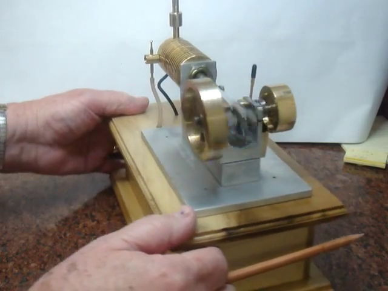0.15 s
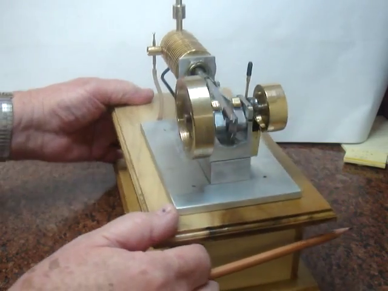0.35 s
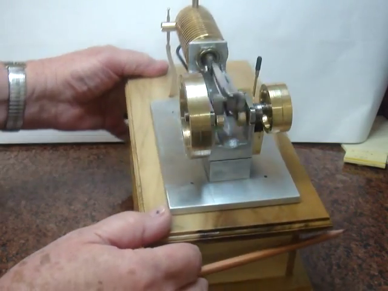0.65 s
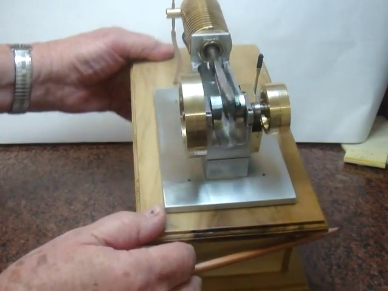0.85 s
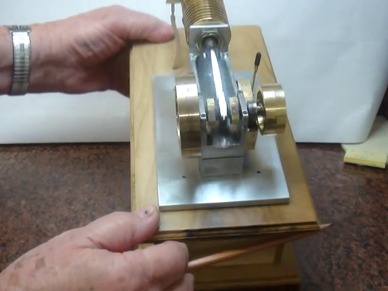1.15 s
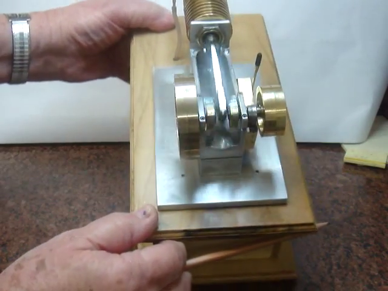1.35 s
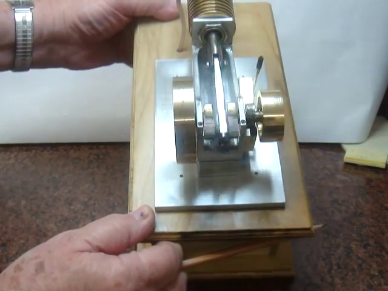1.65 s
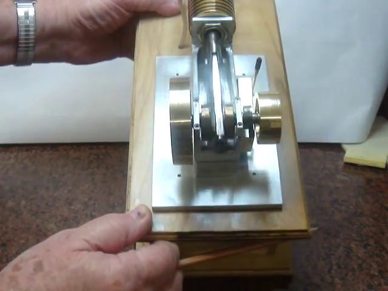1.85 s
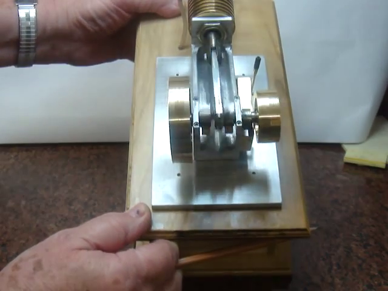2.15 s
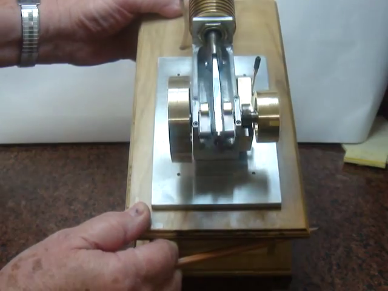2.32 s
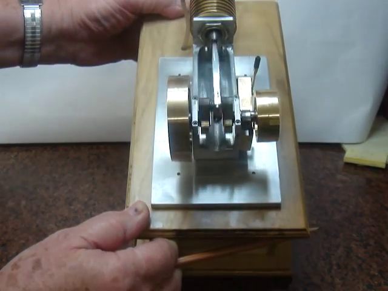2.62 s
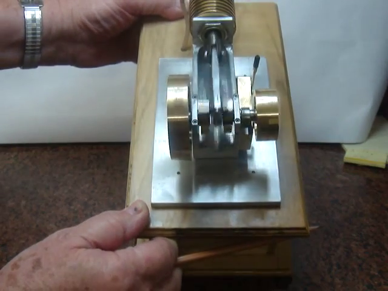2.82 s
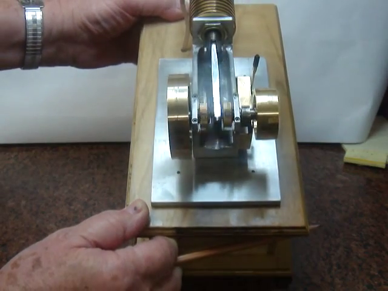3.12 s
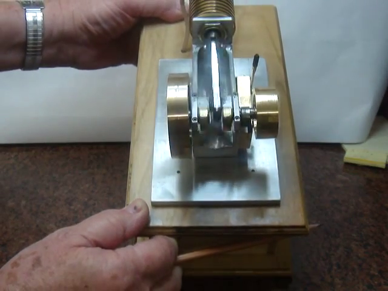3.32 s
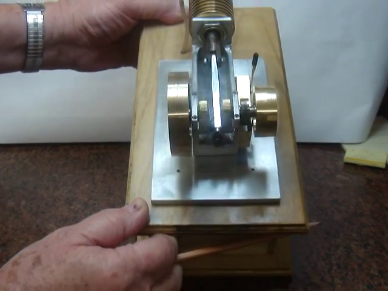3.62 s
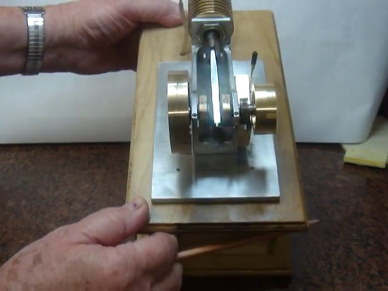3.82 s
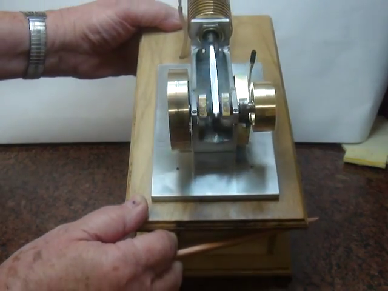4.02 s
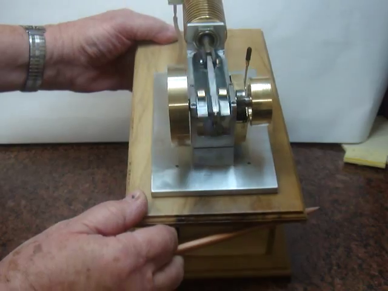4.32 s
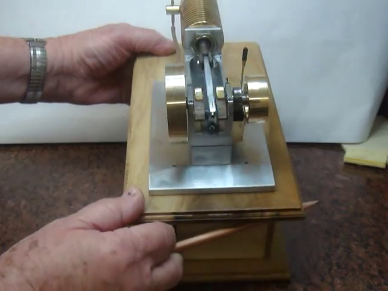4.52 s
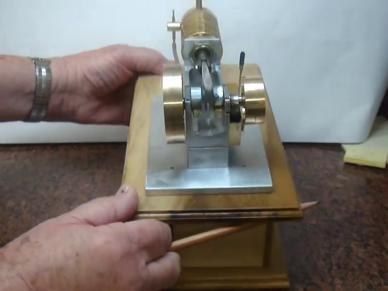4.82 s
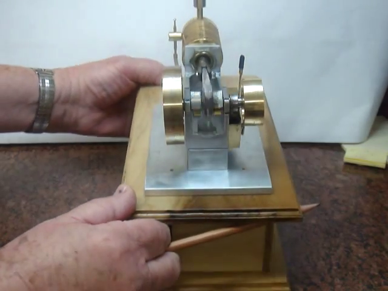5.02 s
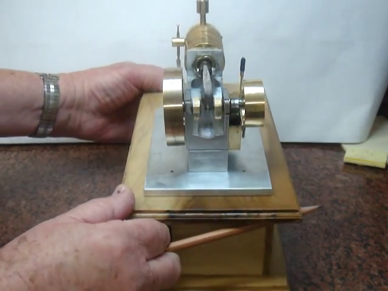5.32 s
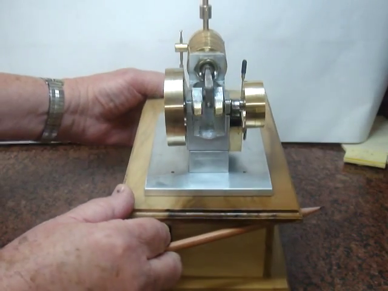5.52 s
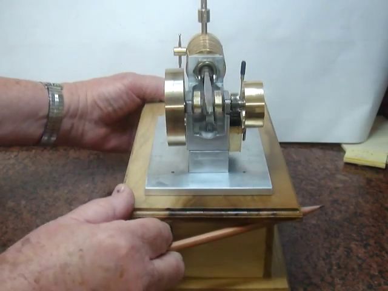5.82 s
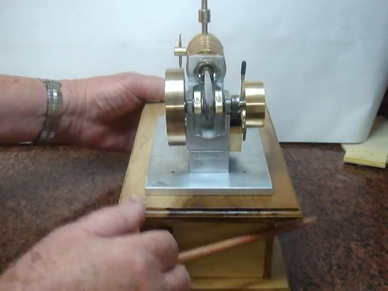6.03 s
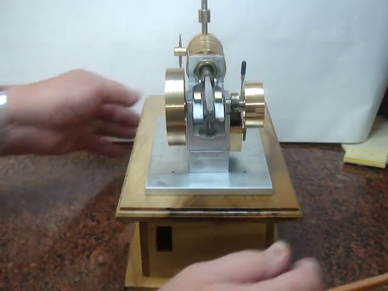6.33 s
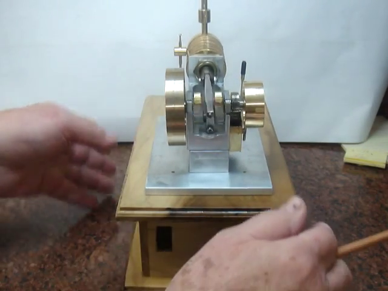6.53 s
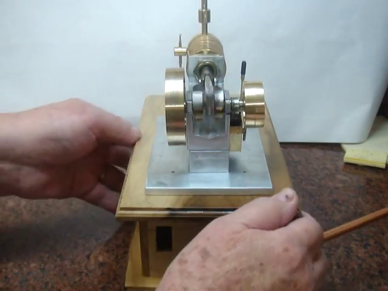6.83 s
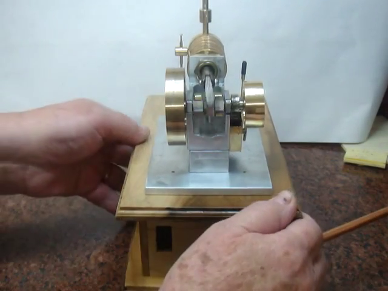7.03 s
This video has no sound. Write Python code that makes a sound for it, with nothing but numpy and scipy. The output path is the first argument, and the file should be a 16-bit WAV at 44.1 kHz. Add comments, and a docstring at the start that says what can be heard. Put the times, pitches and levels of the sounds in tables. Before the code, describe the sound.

Fast, even mechanical clatter of a little solenoid motor on a wooden box, with bright metal ticks, woody knocks and a brief early scrape.

```python
"""In a small room, a small solenoid engine on a wooden box ticks over at about 270 turns a minute.
Each turn the contact closes, the coil yanks the plunger, and the rod clacks, rebounds and knocks back.
Each metal blow is a shaped burst of noise that rings the frame or the contact spring, and the base plate.
Short pushes make the hollow box boom. Its scrape on the counter fades early on, then slowly creeps back.
Faint thuds in the counter, room air and mains hum lie underneath."""
import sys
import numpy as np
from scipy import signal
from scipy.fft import rfft, irfft
from scipy.io import wavfile

SR = 44100
rng = np.random.default_rng(int(sys.argv[2]) if len(sys.argv) > 2 else 0)


def generate_wav(sig):
    """Save sig (samples, or channels by samples) to the path in sys.argv[1] as 16-bit PCM at SR."""
    pcm = np.round(np.clip(np.atleast_2d(sig).T, -1, 1) * 32767).astype(np.int16)
    wavfile.write(sys.argv[1], SR, pcm)


N = 315752
TIME = np.arange(N) / SR
BLOW_SIZE = 4096  # samples in one blow

# The rod at the end of the pull. Each row: time in seconds, clack level in dB, rebound level in dB.
ROD_FORCE = [(0.1, -19.5, -21.5), (0.5, -24, -20.5), (2.8, -19, -24), (4.7, -22.5, -21), (4.95, -18, -28.5),
             (6.05, -19.5, -28), (7, -18.5, -30)]
# The contact as the engine is turned round. Each row: time in seconds, level in dB.
CONTACT_LEVEL = [(0, -26.5), (0.7, -26.5), (1.1, -24.5), (4, -24.5), (5, -26.5), (7.1, -28)]
# The cam closing the contact. Each row: time in seconds, lead before the clack in turns,
# average decay of the closing sound in seconds.
CAM_CLOSING = [(0.5, 0.19, 0.0016), (2.2, 0.18, 0.0013), (4.1, 0.19, .0016), (5, .192, 0.0021),
               (7, 0.19, 0.0043)]
# Tone of the rebound and of the contact's tick. Each row: frequency in Hz, relative level in dB.
BRIGHT_COLOUR = [(800, -83.5), (1400, 16), (2500, -7), (4000, -3.5), (5500, 6), (7000, 0.5), (8300, 10),
                 (10800, -13)]
# Resonances of the metal frame. Each row: frequency in Hz, width in Hz, lift in dB.
FRAME_MODES = [(799.5, 29, 6), (2173, 480, 5), (3150, 210, -1.5), (3350, 28, -21), (5250, 22, -4),
               (7220, 650, -1), (8900, 45, -27), (9660, 91, 13.5), (10504, 506, 19)]
# Scatter from turn to turn of the guided parts and of the loose ones (seconds, dB)
TIGHT_S, TIGHT_DB, LOOSE_S, LOOSE_DB = .0002, 1.2, 0.001186, 1.5


def rod():
    """The rod gives a loud clack with a bright rebound, and a knock on its way back."""
    # Each row: time in seconds, average decay of the clack in seconds.
    chatter_decay = [(0, 0.0021), (2, 0.0031), (4.5, 0.0028), (5.2, 0.0015), (5.8, 0.0048), (7.1, 0.0015)]
    # Tone of the clack. Each row: frequency in Hz, relative level in dB.
    clack_colour = [(800, -6), (1300, -5.5), (1900, -4), (2500, -9), (3400, -2.5), (4400, -5),
                    (5400, -10.5), (6500, -15.5), (8000, -6.5), (9300, -16), (10800, -22.5)]
    # Tone of the return knock. Each row: frequency in Hz, relative level in dB.
    return_colour = [(800, -12), (1300, -4.5), (1900, -7.5), (2500, -8), (3400, -3), (4400, -5),
                     (5400, -4.5), (6500, -12), (8000, -8.5), (9300, -21), (10800, -33)]
    rebound_delay_s = .00515
    s = crank(0)
    clack_db, rebound_db = along(ROD_FORCE, s), along(ROD_FORCE, s, axis=2)
    clack = blows(s, clack_db, clack_colour, FRAME_MODES, rise=0.000587, decay=along(chatter_decay, s),
                  tail_db=-16.5, tail=0.015, alike=0.098, crack=0.65, grain_db=2.0)
    rebound = blows(s + rebound_delay_s, rebound_db, BRIGHT_COLOUR, FRAME_MODES, rise=.00015, decay=.0006,
                    tail_db=-20, tail=.011, alike=.2, crack=2.8, grain_db=4)
    # the clack also jolts the box
    jolt = thumps(s + 0.00311, clack_db - 16, push_s=0.0016, rattle=0.063, soft_hz=834,
                  damping=1.85, pitch=1.016)
    s, db = scattered(*return_stroke(), TIGHT_S, TIGHT_DB)
    back = blows(s, db, return_colour, FRAME_MODES, rise=0.00021, decay=0.0032,
                 tail_db=5.5, tail=0.0052, alike=0.086, crack=2.8, grain_db=3)
    return clack + rebound + jolt + back


def plunger():
    """The coil jerks the plunger, which slaps its bore and rattles on its pin; pull and slap shake the box."""
    # The coil's pull. Each row: time in seconds, knock level in dB, box level in dB.
    pull_force = [(0, -31, -31), (0.5, -30.5, -29.5), (1.1, -30, -39), (1.9, -27, -31.5),
                  (2.9, -30.5, -31.5), (4.5, -29, -33.5), (5.3, -31, -28.5), (5.9, -30, -29),
                  (7, -28.5, -29.5)]
    # Rattle on the pin. Each row: time in seconds, level in dB before its bass is cut.
    pin_level = [(0, -49), (0.75, -33), (1, -51), (4, -49), (4.3, -31), (5, -28), (7, -35)]
    # Tone of the pull and the pin. Each row: frequency in Hz, relative level in dB.
    pull_colour = [(800, 1.5), (1300, 7.5), (1900, -6.5), (2500, -7.5), (3400, -3.5), (4400, 0.5),
                   (5400, -13), (6500, -13), (8000, -17), (9300, -31), (10800, -25.5)]
    # Dull tone of the slap. Each row: frequency in Hz, relative level in dB.
    slap_colour = [(700, -6), (1000, 8), (1400, 6), (2200, -16), (3200, -11.5), (4500, -22), (6500, -38),
                   (10800, -38)]
    pull_delay_s, pin_lead_s = .0142, .0088  # after the contact closes; before the clack
    slap_box_db = -0.4  # thump of the box relative to the slap

    s, luck_db = scattered(closings() + pull_delay_s, 0, TIGHT_S, LOOSE_DB)
    knock_db = along(pull_force, s) + luck_db
    box_db = along(pull_force, s, axis=2) + luck_db
    pull = blows(s, knock_db, pull_colour, FRAME_MODES, rise=.0003, decay=0.0019,
                 tail_db=-7, tail=0.019, alike=0.19, crack=2.5, grain_db=3.5)
    pull += thumps(s + 0.00205, box_db, push_s=0.0054, rattle=0.063, soft_hz=624, damping=0.46, pitch=1.02)

    s, db = slaps()
    slap = blows(s, db, slap_colour, FRAME_MODES, rise=.0004, decay=.006,
                 tail_db=-10, tail=.012, alike=.15, crack=3, grain_db=3)
    slap += thumps(s, db + slap_box_db, push_s=0.0029, rattle=0.036, soft_hz=900, damping=0.74, pitch=1.02)

    s = crank(0) - pin_lead_s
    s, db = scattered(s, along(pin_level, s), LOOSE_S, LOOSE_DB)
    pin = blows(s, db, pull_colour, FRAME_MODES, rise=.0004, decay=0.0025,
                tail_db=-12, tail=0.0071, alike=0.086, crack=1.5, grain_db=3)
    return pull + slap + band(pin, 1270, "high")


def contact():
    """The cam touches the spring lightly, closes it, and lets it go with a tick and a short chatter."""
    # Tone of the contact. Each row: frequency in Hz, relative level in dB.
    contact_colour = [(800, -22.5), (1300, -15), (1900, -2), (2500, -3), (3400, 1.5), (4400, -2.5),
                      (5400, -4.5), (6500, -12), (8000, -1), (9300, 0), (10800, -7)]
    # Resonances of the contact spring. Each row: frequency in Hz, width in Hz, lift in dB.
    spring_modes = [(1420, 70, -2), (1860, 70, 0), (2190, 70, 5), (3050, 70, 6), (3490, 70, 7),
                    (7900, 220, -1), (9000, 250, -4), (10520, 200, 1), (10920, 150, -1)]
    s = closings()
    s, db = scattered(s, along(CONTACT_LEVEL, s), TIGHT_S, TIGHT_DB)
    touch = blows(s - .0365, db - 13.0, contact_colour, spring_modes, rise=.0002, decay=.0016,
                  tail_db=-14, tail=.006, alike=.2, crack=2, grain_db=3)
    close = blows(s, db, contact_colour, spring_modes, rise=.0003, decay=along(CAM_CLOSING, s, axis=2),
                  tail_db=-11.5, tail=0.01, alike=0.16, crack=1.5, grain_db=3)
    s, db = return_stroke()
    let_go = s - .014 + rng.normal(0, 0.0005, len(s))
    tick = blows(let_go, db - 16.5, BRIGHT_COLOUR, FRAME_MODES, rise=.0003, decay=.0015,
                 tail_db=-15, tail=.005, alike=.2, crack=2, grain_db=3)
    chatter = blows(let_go, db - 7, contact_colour, spring_modes, rise=.002, decay=.004,
                    tail_db=-6, tail=.006, alike=.2, crack=1, grain_db=4)
    return touch + close + tick + chatter


def box():
    """The box rocks softly on its feet before each pull and recoils after each clack."""
    # Rocking as the box is held. Each row: time in seconds, lead before the clack in seconds, level in dB.
    rocking = [(0.1, 0.081, -37.5), (0.55, 0.079, -33), (1.2, .072, -36.5), (1.62, 0.051, -32.5),
               (1.85, 0.037, -44.5), (3, 0.052, -33), (4.05, .062, -34.5), (5, 0.084, -31.5),
               (7.2, .091, -35.5)]
    recoil_delay_s, recoil_db = .0132, -27.5  # after the clack
    clacks = crank(0)
    rock_s = clacks - along(rocking, clacks)
    s, db = scattered(rock_s, along(rocking, clacks, axis=2), TIGHT_S, TIGHT_DB)
    rock = thumps(s, db, push_s=0.0044, rattle=0.044, soft_hz=466, damping=0.75, pitch=1.033)
    s, db = scattered(clacks + recoil_delay_s, recoil_db, LOOSE_S, LOOSE_DB)
    recoil = thumps(s, db, push_s=0.0059, rattle=0.09, soft_hz=606, damping=0.87, pitch=0.97)
    return rock + recoil


def blows(times, levels_db, colour, modes, rise, decay, tail_db, tail, alike, crack, grain_db):
    """Metal blows: a crack, a dense ring and a gritty shiver after it, partly the same on every turn."""
    t, out = np.arange(BLOW_SIZE) / SR, np.zeros(N)
    same, alike = rng.standard_normal(BLOW_SIZE), np.clip(alike, 0, 1)
    for s, db, life in np.broadcast(times, levels_db, decay):
        own = rng.standard_normal(BLOW_SIZE)
        # the dying noise is gritty: a new random level, within limits, every 32 samples
        steps = np.clip(rng.standard_normal(128), -2, 2)
        grit = from_db(grain_db * np.repeat(steps, BLOW_SIZE // 128))
        ring = np.exp(-t / (life * from_db(rng.normal())))
        shiver = from_db(tail_db) * grit * np.exp(-t / tail)
        shape = (1 - np.exp(-t / rise)) * (ring + shiver)
        force = shape * (np.sqrt(alike) * same + np.sqrt(1 - alike) * own)
        force[int(2 * rise * SR)] += crack
        blow = coloured(force, colour)
        blow = band(blow + ringing(blow, modes), 520, "high", order=4)
        add(out, s, from_db(db) * blow / rms(blow[:SR // 200]))  # level over the first 5 ms
    return out


def thumps(times, levels_db, push_s, rattle, soft_hz, damping, pitch):
    """A brief push rings the box; its modes shift with the grip of the hands, and little bass leaves it."""
    # The grip shifts the box's main note. Each row: time in seconds, note in Hz before the pitch factor.
    grip_note = [(0, 356), (0.5, 373), (1.4, 345.8), (2.7, 360.4), (3.7, 365.3), (4.6, 336), (5.1, 340),
                 (6.5, 394), (7.15, 387)]
    # Box modes at the usual note, before shift and scatter. Each row: frequency in Hz,
    # width in Hz before damping, level in dB.
    box_modes = [(313.4, 25, 6.5), (340.6, 59, 14.5), (422, 13, -1.5), (435.6, 10.7, 2.5), (465, 13, -51)]
    usual_note_hz, lowest_hz = 346.8, 274.5
    t, out = np.arange(BLOW_SIZE) / SR, np.zeros(N)
    for s, db in zip(times, levels_db):
        push = rattle * rng.standard_normal(BLOW_SIZE) * np.exp(-t / push_s)
        push[0] += 1
        shift = pitch * along(grip_note, s) / usual_note_hz
        modes = []
        for hz, width, gain in box_modes:
            mode_hz = hz * shift * (1 + .035 * rng.normal())
            modes.append((mode_hz, width * damping, gain + 3 * rng.normal()))
        boom = band(ringing(push, modes), lowest_hz, "high", order=8)
        boom = band(boom, soft_hz, "low")
        # starts 2.5 ms early; level over the first 12.5 ms
        add(out, s - .0025, from_db(db) * boom / rms(boom[:SR // 80]))
    return out


def crank(angle, count=33):
    """The moment in each turn at which the crank passes an angle, in turns counted from the clack."""
    # Each row: time in seconds, flywheel speed in turns per minute.
    speed = [(0.0, 273.64), (0.55, 281.77), (1.05, 276.27), (1.85, 275.84), (2.15, 271.44), (2.5, 274.74),
             (2.8, 270.97), (3.5, 269.97), (4.35, 265.02), (5.15, 271.82), (5.65, 270.13), (5.85, 265.82),
             (7.1, 264.71)]
    first_clack_s = .1049
    t = np.arange(N + SR) / SR
    turns = np.cumsum(along(speed, t)) / (60 * SR)
    first_turn = np.interp(first_clack_s, t, turns)
    return np.interp(np.arange(count) + angle + first_turn, turns, t)


def closings():
    """The moments at which the cam closes the contact."""
    return crank(-along(CAM_CLOSING, crank(0)))


def slaps():
    """Times and levels of the plunger's slaps: one a turn, a few of them hard."""
    # Each row: time in seconds, level in dB.
    slap_level = [(0, -26.5), (0.53, -25), (0.95, -31), (2.9, -33.5), (3.15, -35.5), (4.1, -31), (5, -34),
                  (5.8, -28), (7, -27)]
    # Turns on which it slaps hard. Each row: time in seconds, level in dB.
    hard_slaps = [(1.8238, -22), (2.0425, -24.5), (2.2595, -22), (2.4836, -26), (2.6988, -22.5),
                  (4.2617, -28)]
    s = crank(0) - .0135  # just before the clack
    s, db = scattered(s, along(slap_level, s), LOOSE_S, LOOSE_DB)
    for hard_s, hard_db in hard_slaps:
        turn = np.argmin(abs(s - hard_s))
        s[turn], db[turn] = hard_s, hard_db
    return s, db


def return_stroke():
    """Times and levels of the rod falling back."""
    s = crank(.2715)  # turns after the clack
    return s, along(CONTACT_LEVEL, s) - 1.4


def scattered(s, db, spread_s, spread_db):
    """No two turns are quite alike in timing or strength."""
    shift, strength = rng.standard_normal((len(s), 2)).T
    return s + spread_s * shift, db + spread_db * strength


def from_db(db):
    """Decibels to gain."""
    return 10 ** (np.asarray(db) / 20)


def rms(x):
    """Root mean square: the average strength of a sound."""
    return np.sqrt(np.mean(x ** 2) + 1e-20)


def along(curve, s, axis=1):
    """A column of a table, joined by straight lines and read at the times s."""
    curve = np.array(curve)
    return np.interp(s, curve[:, 0], curve[:, axis])


def at_hz(points, hz, axis=1):
    """A column of a table, joined on a log-frequency axis."""
    points = np.array(points)
    return np.interp(np.log(hz + 1), np.log(points[:, 0]), points[:, axis])


def band(x, hz, kind, order=2):
    """Butterworth filter: keeps the lows, the highs or a band."""
    return signal.sosfilt(signal.butter(order, hz, kind, fs=SR, output="sos"), x)


def coloured(x, colour):
    """Minimum-phase filter with the given spectrum: it acts at once, with no sound ahead of the blow."""
    size = len(x)
    gain = from_db(at_hz(colour, np.fft.rfftfreq(size, 1 / SR)))
    # folding the cepstrum forward gives the phase that goes with this gain
    cepstrum = irfft(np.log(gain), size)
    cepstrum[1:size // 2] *= 2
    cepstrum[size // 2 + 1:] = 0
    return irfft(rfft(x) * np.exp(rfft(cepstrum)), size)


def resonance(x, hz, width):
    """Two-pole resonance with gain 1 on top; a narrow one rings longer."""
    r = np.exp(-np.pi * width / SR)
    feed = np.array([1, 0, -1]) * (1 - r * r) / 2
    return signal.lfilter(feed, [1, -2 * r * np.cos(2 * np.pi * hz / SR), r * r], x)


def ringing(x, modes):
    """A set of resonances side by side."""
    return sum(from_db(db) * resonance(x, hz, width) for hz, width, db in modes)


def add(track, s, sound):
    """Lay a sound into a track at time s."""
    start = int(np.clip(s * SR, 0, N))
    track[start:start + len(sound)] += sound[:N - start]


def counter():
    """Clacks pass through the feet into the counter as faint low thuds, more so when the hands press."""
    # How firmly the box is held down. Each row: time in seconds, thud level in dB relative to the clack.
    pressure = [(0, -54), (1.5, -47), (2.3, -41), (3.8, -37), (4.7, -49), (7.1, -52)]
    # Tone of the thud. Each row: frequency in Hz, relative level in dB.
    counter_colour = [(20, -5), (45, -5), (100, -6), (160, 0), (240, 6), (330, -16), (700, -53)]
    s = crank(0)
    t, out = np.arange(2 * BLOW_SIZE) / SR, np.zeros(N)
    for start, level_db in zip(s, along(ROD_FORCE, s) + along(pressure, s)):
        thud = coloured(rng.standard_normal(len(t)) * np.exp(-t / 0.05), counter_colour)
        add(out, start, from_db(level_db + 2 * rng.normal()) * thud / rms(thud))
    return out


def room(x, first_s, build_s):
    """Reflections thicken after the first wall and die at their own pace in each band."""
    # Each row: frequency in Hz, time to fade by 60 dB in seconds, level in dB.
    room_bands = [(168, 0.043, 8), (350, 0.39, -11), (840, 0.45, -2), (1900, 0.07, -12.5),
                  (5240, 0.14, -8.5), (8100, 0.2, -9), (11000, 0.2, -11)]
    t, response = np.arange(SR // 2) / SR, 0
    edges = np.geomspace(100, 14000, 13)
    for low, high in zip(edges, edges[1:]):
        hz = np.sqrt(low * high)
        build_up = 1 - np.exp(-np.maximum(t - first_s, 0) / build_s)
        shape = build_up * np.exp(-np.log(1000) * t / at_hz(room_bands, hz))
        reflections = band(rng.standard_normal(len(t)), [low, high], "band")
        level = from_db(at_hz(room_bands, hz, axis=2))
        response = response + level * reflections * shape / np.sqrt(np.sum(shape ** 2))
    return signal.fftconvolve(x, response)[:N]


def background():
    """Filtered noise makes the room air and the uneven scrape of the box; sine waves make the mains hum."""
    # Tone of the air. Each row: frequency in Hz, relative level in dB.
    air_colour = [(25, -15), (80, -17.5), (150, -8), (230, -7), (330, -3), (600, -4), (1400, -2.5),
                  (2500, -7), (5000, -12.5), (11000, -17.5)]
    # Mains hum. Each row: frequency in Hz, rms level in dB.
    hum_tones = [(60, -79), (120, -74)]
    # The box sliding on the counter. Each row: time in seconds, rms level in dB.
    slide_level = [(0, -41), (.25, -42.5), (.5, -48), (.8, -44.5), (1.1, -52), (1.4, -70), (7.2, -52)]
    # Tone of the scrape. Each row: frequency in Hz, relative level in dB.
    slide_colour = [(150, -53), (400, -18), (800, -9), (1700, -6), (2200, -6), (2900, -6), (3600, -6.5),
                    (4500, -6.5), (7000, -16), (11000, -20)]
    # Faint squeak of the rubbing feet. Each row: frequency in Hz, width in Hz, lift in dB.
    feet_modes = [(1650, 60, 3), (2760, 160, 1), (3270, 140, 0), (3650, 110, -7)]
    air = coloured(rng.standard_normal(N), air_colour)
    hum = sum(np.sqrt(2) * from_db(db) * np.sin(2 * np.pi * hz * TIME) for hz, db in hum_tones)
    catching = band(rng.standard_normal(N), 100, "low")
    unevenness = from_db(2 * catching / rms(catching))
    scrape = coloured(rng.standard_normal(N) * unevenness, slide_colour)
    scrape = scrape + ringing(scrape, feet_modes)
    return from_db(-46.5) * air / rms(air) + hum + from_db(along(slide_level, TIME)) * scrape / rms(scrape)


def scene():
    """The engine close by, in its room; every metal blow also rings the base plate."""
    # As the engine is turned, the plate faces the front more or less. Each row: time in seconds, lift in dB.
    facing = [(0, 16.5), (1, -2.5), (2, -8), (3, -16), (4, -7), (5, 4), (6, 9.5), (7.1, 19)]
    # Resonances of the base plate. Each row: frequency in Hz, width in Hz, level in dB before that lift.
    plate_modes = [(841, 11, -5.5), (1395, 82, -19), (1650, 26, -7), (2000, 80, -23.5), (2250, 250, -14.5),
                   (2535, 73, -7.5)]
    metal = rod() + plunger() + contact()
    plate = from_db(along(facing, TIME)) * ringing(metal, plate_modes)
    engine = from_db(-0.5) * (metal + plate) + box()
    reflected = from_db(-1.5) * room(engine, first_s=0.0027, build_s=0.00045)
    return (engine + reflected + counter() + background())[None]


def record(dry):
    """A steep elliptic filter cuts the top above 11080 Hz."""
    return signal.sosfilt(signal.ellip(12, .2, 80, 11080, fs=SR, output="sos"), dry)


dry = scene()
out = record(dry)
generate_wav(out)
```